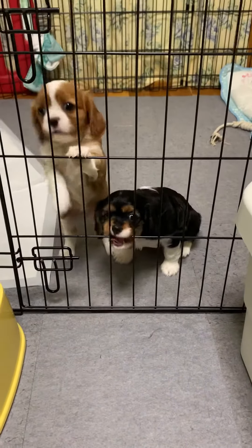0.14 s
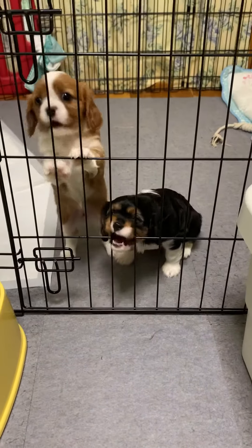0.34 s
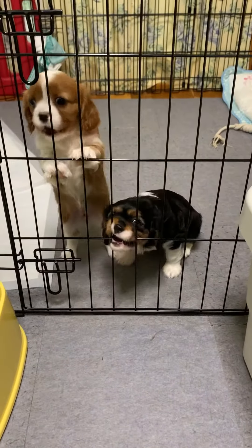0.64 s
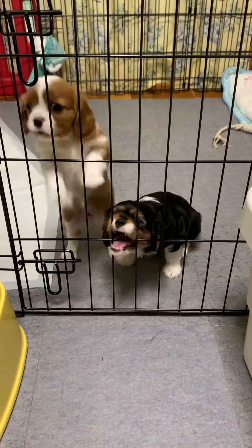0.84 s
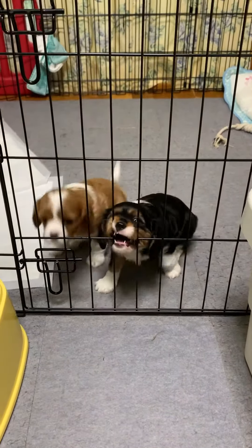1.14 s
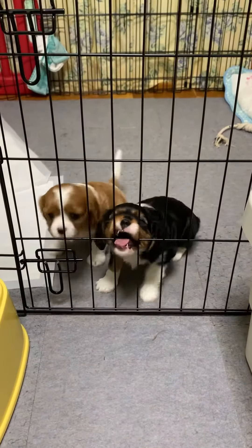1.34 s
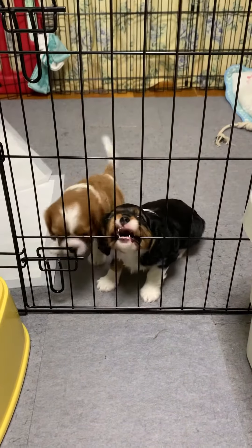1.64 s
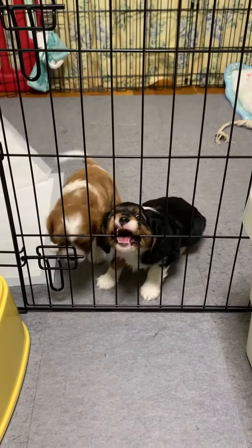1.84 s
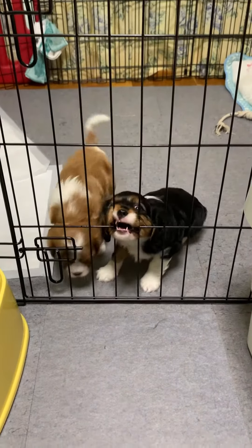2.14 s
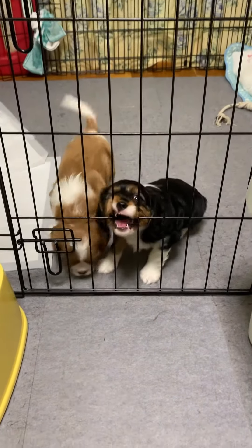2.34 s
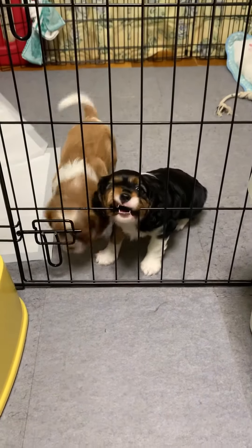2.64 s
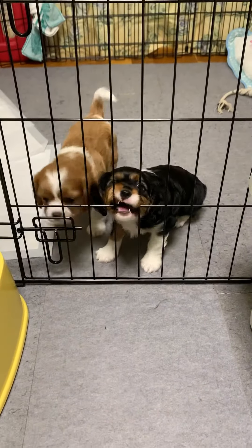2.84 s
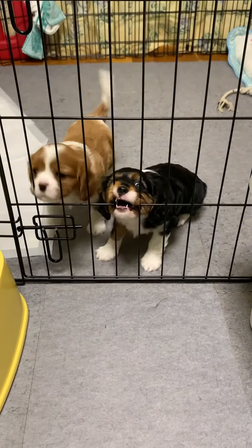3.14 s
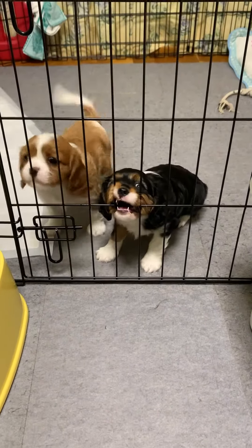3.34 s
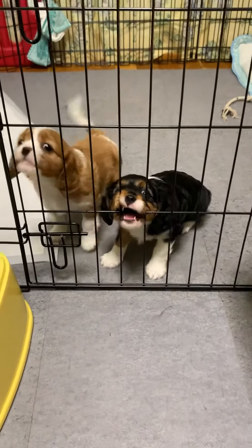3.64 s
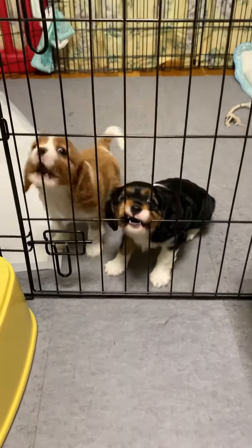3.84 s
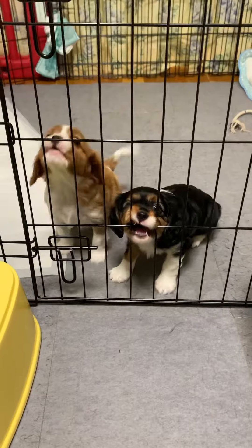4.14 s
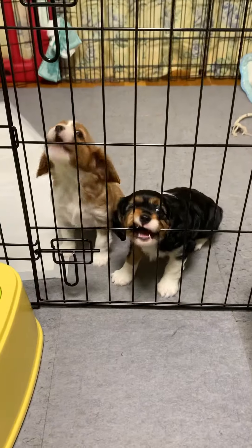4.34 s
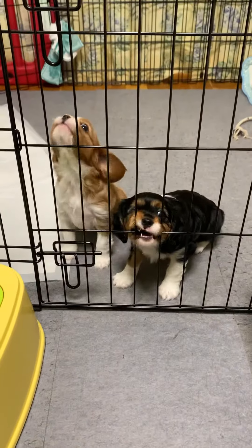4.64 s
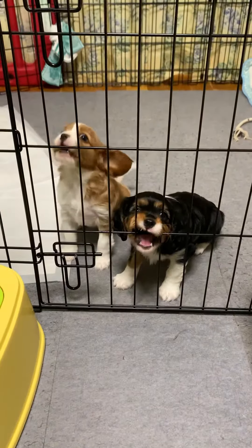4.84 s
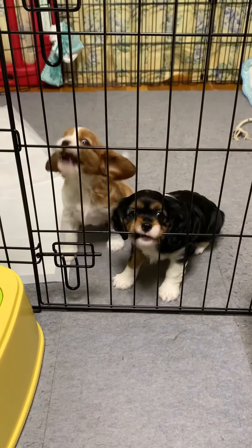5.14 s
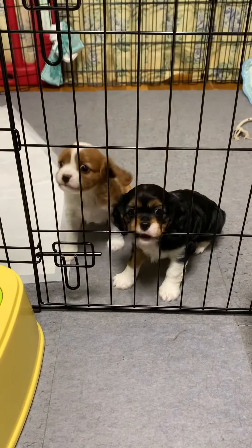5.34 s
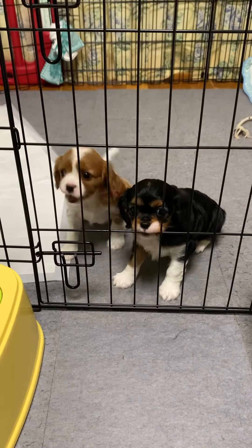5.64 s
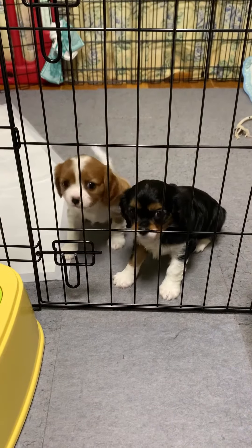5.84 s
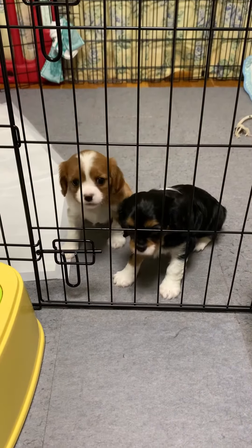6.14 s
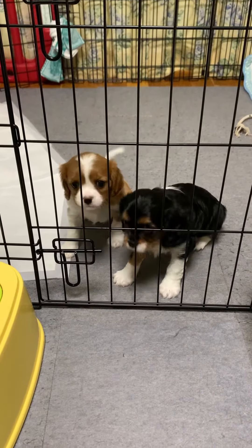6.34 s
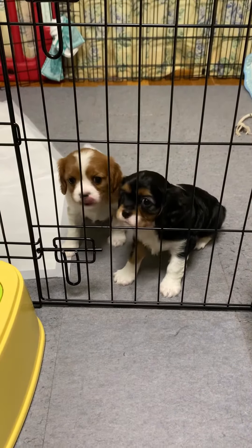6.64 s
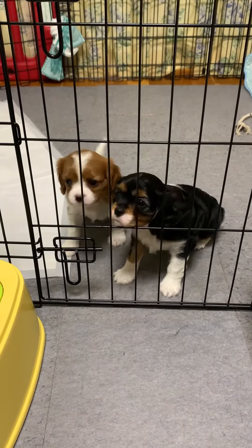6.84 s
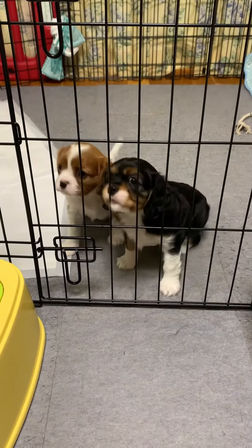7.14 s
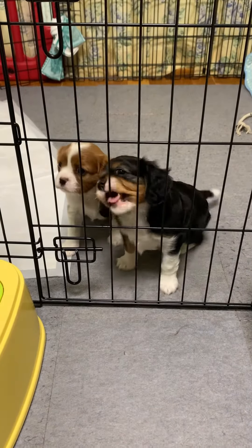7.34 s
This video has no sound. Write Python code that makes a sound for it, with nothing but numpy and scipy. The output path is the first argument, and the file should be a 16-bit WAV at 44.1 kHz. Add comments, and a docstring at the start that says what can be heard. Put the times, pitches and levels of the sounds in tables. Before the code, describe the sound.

In a small room, two puppies cry in a wire pen, picked up fairly close in stereo. A low machine hum throbs rapidly, about thirteen soft pulses a second, under faint still air, growing clearly louder to the end. A faint pant opens, then sharp, high, slightly raspy yelps hit at 0.15, 0.5 and 0.8 s, with softer whines between. A quieter fourth yelp at 1.4 s falls into a long whine. From about 2 to 5 s thin, arching whimpers overlap longer, flatter open-mouthed whines, increasingly breaking into rasps; soft paw scuffs fall at 2.1, 2.7 and 3.2 s. A distinct claw tick rings on the wire at 4.8 s. Low, rough groans appear from 4.8 to 6.5 s among shorter, sparser whimpers, with light ticks near 6 s. Two gentle whines come around 6.9 s, a breathy puff at 7.2 s, then a short high squeal at 7.4 s.

```python
"""Two puppies in a wire pen: three yelps with whines between them, a fourth yelp, overlapping whines that
break into rasps, low groans from about 4.8 s and a squeal near the end. Voices are fold harmonics shaped by
throat and mouth; pants are noise puffs. Claws tick on ringing pen modes and paws scuff softly from 1.3 s on.
Throughout, knocked panels throb in a low hum that grows louder, over still air. A small room adds reflections
and a microphone pair adds phase and level differences."""
import sys
import numpy as np
from scipy import signal
from scipy.fft import rfft, irfft
from scipy.io import wavfile
from scipy.ndimage import uniform_filter1d

SR = 44100
rng = np.random.default_rng(int(sys.argv[2]) if len(sys.argv) > 2 else 0)


def to_wav(sig):
    """Store sig (one row per channel, or 1-D mono) as 16-bit WAV at the path in sys.argv[1].

    Samples outside -1..1 are clipped; the rate is SR.
    """
    pcm = np.clip(np.atleast_2d(sig), -1, 1) * 32767
    pcm = np.round(pcm).astype(np.int16)
    wavfile.write(sys.argv[1], SR, pcm.T)  # frames by channels


N = 330750
TIME = np.arange(N) / SR
CUTOFF_HZ = 15800


def from_db(db):
    """Decibels to amplitude gain."""
    return 10 ** (np.asarray(db) / 20)


def rms_one(x):
    """Scale to unit power."""
    return x / np.sqrt(np.mean(x ** 2) + 1e-20)


def at_hz(points, hz):
    """Interpolate a spectrum on a log-frequency axis."""
    point_hz, value = np.transpose(points)
    return np.interp(np.log(np.maximum(hz, 1)), np.log(point_hz), value)


def low_pass(x, hz):
    """Second-order low-pass."""
    return signal.sosfilt(signal.butter(2, min(hz, .45 * SR), fs=SR, output="sos"), x)


def wander(size, hz):
    """Low-passed random motion, rms 1."""
    settled = low_pass(rng.standard_normal(size + SR // 4), hz)[-size:]
    return rms_one(settled)


def coloured_noise(spectrum):
    """Noise of a given colour, rms 1."""
    gain = from_db(at_hz(spectrum, np.fft.rfftfreq(N, 1 / SR)))
    return rms_one(irfft(rfft(rng.standard_normal(N)) * gain, N))


def arch(t, turn_s, first, turn, last, ease_in, ease_out):
    """Control curve from first value through a turning point to last; an ease of 1 is straight."""
    before = np.clip(1 - t / max(turn_s, 1e-3), 0, 1)
    after = np.clip((t - turn_s) / max(t[-1] - turn_s, 1e-3), 0, 1)
    return turn + (first - turn) * before ** ease_in + (last - turn) * after ** ease_out


def gesture(rows, fade_s=.008):
    """Sample indices, soft on-off gate and control curves of one utterance."""
    s, *columns = np.transpose(rows)
    at = np.flatnonzero((TIME > s[0] - fade_s / 2) & (TIME < s[-1] + fade_s))
    t = TIME[at]
    gate = np.clip(np.minimum(t - t[0], s[-1] + fade_s - t) / fade_s, 0, 1)
    return at, gate, [np.interp(t, s, c) for c in columns]


def ring(clicks, hz, t60_s):
    """Damped resonance: a unit click starts a decaying sine of height 1."""
    r = from_db(-60 / (t60_s * SR))
    w = 2 * np.pi * hz / SR
    return signal.lfilter([0, np.sin(w)], [1, -2 * r * np.cos(w), r * r], clicks + 1e-18)


def strikes(events):
    """One click per (time [s], level [dB]) row."""
    out = np.zeros(N)
    for s, db in events:
        out[int(s * SR)] += from_db(db)
    return out


def yelps():
    """Hard, fast cries and the last squeal: strong effort swells, and the folds rasp at each onset."""
    # yelps: (start [s], length [s], pitch turn after [s], first pitch [Hz], turning pitch [Hz],
    # last pitch [Hz], loudest after [s], fundamental [dB], octave [dB], overtones [dB])
    yelp_events = [ (0.15, 0.085, 0.066, 1048, 1639, 1598, 0.058, -31.5, -42.5, -43.5),
                   (0.472, 0.123, 0.047, 1000, 1557, 1648, 0.06, -37, -40, -47),
                   (0.787, 0.099, 0.067, 1043, 1567, 1556, 0.057, -37.5, -45.5, -45.5),
                   (1.43, 0.135, 0.047, 1438, 1680, 1211, 0.075, -51.5, -48.5, -48.5),
                   (7.363, 0.16, 0.0605, 1880, 1947, 1840, 0.003, -42.5, -39, -46.5), ]
    # mouth gain on the octave: (frequency [Hz], level [dB])
    mouth = [(2100, 0), (2600, 2), (3100, -10), (3300, -26), (3800, -10)]
    # rasps within the cries: (from [s], to [s], roughness [0-1])
    rasps = [(0.184,0.198,0.59),(0.529,0.6,0.71),(0.869,0.877,0.54),(7.374,7.397,0.22)]
    # throat gain on the overtones: (frequency [Hz], level [dB])
    throat = [(2600,17),(3300,-21),(3800,16.5),(4500,-4.5),(5100,9),(5600,-5.5),(6200,-2.5),(7000,-13.5),(9500,-13),(11000,-21.5),(12400,-13.5),(13300,-13.5),(14200,-22.5),(16000,-23.5)]
    shapes = cry_shapes(yelp_events, mouth, swell_db=31.5, fade_db=6, opening_db=21, closing_db=19.5,
                        widest_share=0.3, octave_follows=0.49, scoop_ease=1.3, sag_ease=1.3,
                        waver=0.0028, catch_db=6)
    return cries(shapes, onset_rasps(yelp_events) + rasps, throat, quiver=0.012, hoarse=0.031,
                 shimmer_db=3.5, rasp_width_hz=340, core_rough=0.17, split=1.1)


def thin_whines():
    """First puppy: short arching whines through a nearly closed mouth."""
    # whines: (start [s], length [s], pitch turn after [s], first pitch [Hz], turning pitch [Hz],
    # last pitch [Hz], loudest after [s], fundamental [dB], octave [dB], overtones [dB])
    whine_events = [ (1.112, 0.12, 0.058, 957, 1323, 1180, 0.058, -56.5, -60, -68),
                    (1.335, 0.11, 0.06, 914, 1326, 1440, 0.005, -67.5, -58.5, -70),
                    (2.185, 0.064, 0.04, 953, 1130, 1056, 0.027, -65.5, -64, -76.5),
                    (2.465, 0.041, 0.036, 870, 753, 796, 0.033, -60.5, -67, -75),
                    (2.505, 0.13, 0.028, 835, 917, 749.5, 0.15, -56, -64.5, -79),
                    (2.87, 0.09, 0.056, 808, 1150, 1060, 0.047, -60.5, -62, -72.5),
                    (2.955, 0.15, 0.11, 1056, 1061, 939, 0.084, -55.5, -73, -70.5),
                    (3.28, 0.31, 0.087, 718, 1155, 1097, 0.12, -58, -64.5, -68.5),
                    (3.66, 0.1, 0.042, 760.5, 1242, 1185, 0.05, -60, -63, -72),
                    (3.77, 0.18, 0.1, 1197, 1153, 1125, 0.15, -51.5, -57, -63),
                    (4.14, 0.15, 0.043, 784.3, 1177, 976, 0.14, -55, -58.5, -66.5),
                    (4.29, 0.14, 0.076, 981.5, 1180, 1045, 0.086, -49.5, -59.5, -68),
                    (4.69, 0.069, 0.027, 710, 814, 697, 0.047, -50, -71, -75.5),
                    (4.83, 0.18, 0.094, 717.6, 985, 953, 0.089, -53.5, -66.5, -85),
                    (5.095, 0.098, 0.028, 938, 975, 743, 0.066, -55, -62, -71.5),
                    (5.502, 0.078, 0.036, 777, 861, 660, 0.044, -56.5, -60.5, -78.5),
                    (5.72, 0.11, 0.056, 942, 921, 790, 0.072, -60, -63.5, -77),
                    (6.19, 0.1, 0.05, 813.4, 861, 802, 0.037, -79, -66.5, -82.5),
                    (6.3, 0.084, 0.035, 782, 786.3, 765, 0.037, -66, -63, -76.5),
                    (6.865, 0.1, 0.049, 880, 1032, 873, 0.015, -62.5, -71, -81.5),
                    (6.96, 0.13, 0.1, 893, 1032, 996, 0.085, -57.5, -65, -74), ]
    # mouth gain on the octave: (frequency [Hz], level [dB])
    mouth = [(1400, -3), (1700, 1), (2100, -6), (2350, -9), (2700, -24)]
    # rasps: (from [s], to [s], roughness [0-1])
    rasps = [(1.333,1.37,0.71),(4.71,4.883,0.54),(5.126,5.153,1),(5.543,5.62,0.6),(6.859,6.921,1)]
    # throat gain on the overtones: (frequency [Hz], level [dB])
    throat = [(2400,1.5),(3300,-8),(4300,-4.5),(5300,-5.5),(7000,-2.5),(8500,-1),(10000,-11),(12000,-40.5),(16000,-14.5)]
    shapes = cry_shapes(whine_events, mouth, swell_db=13.5, fade_db=9, opening_db=11.5, closing_db=14.5,
                        widest_share=1.0, octave_follows=0.24, scoop_ease=1.7, sag_ease=1.2,
                        waver=0.0071, catch_db=7)
    return cries(shapes, rasps, throat, quiver=0.011, hoarse=0.061, shimmer_db=3.5,
                 rasp_width_hz=67, core_rough=0.6, split=0.51)


def full_whines():
    """Second puppy: longer, open-mouthed, flatter notes with a strong octave."""
    # whines: (start [s], length [s], pitch turn after [s], first pitch [Hz], turning pitch [Hz],
    # last pitch [Hz], loudest after [s], fundamental [dB], octave [dB], overtones [dB])
    whine_events = [ (0.29, 0.27, 0.06, 1078, 1048, 976, 0.079, -64, -73, -90),
                    (0.62, 0.19, 0.1, 970, 942, 980, 0.06, -61, -64.5, -85.5),
                    (0.91, 0.047, 0.03, 1030, 1065, 1094, 0.0087, -65, -68, -117),
                    (1.52, 0.44, 0.08, 1327, 1116, 1053, 0.34, -56, -51, -74.5),
                    (2.255, 0.27, 0.048, 1049, 1018, 1023, 0.15, -55.5, -56, -79),
                    (2.49, 0.31, 0.037, 1015, 1063, 946, 0.037, -56.5, -70.5, -83),
                    (3.072, 0.17, 0.079, 1015, 1000, 1082, 0.18, -56, -59.5, -84.5),
                    (3.23, 0.26, 0.067, 1080, 984, 951, 0.11, -53, -56.5, -76.5),
                    (3.75, 0.37, 0.11, 953, 858, 929.8, 0.15, -56, -53.5, -76.5),
                    (4.412, 0.237, 0.195, 940, 808, 835, 0.13, -55.5, -59, -81),
                    (4.66, 0.13, 0.063, 834, 903, 883, 0.033, -58.5, -56.5, -83.5),
                    (5.24, 0.13, 0.097, 692, 921, 842, 0.031, -57.5, -72, -98.5), ]
    # mouth gain on the octave: (frequency [Hz], level [dB])
    mouth = [(1500, -6), (1800, -3), (2400, -0.5)]
    # rasps: (from [s], to [s], roughness [0-1])
    rasps = [(1.957,1.99,0.58),(2.235,2.301,1),(3.058,3.237,0.78),(3.747,3.817,0.25),(4.411,4.519,0.99),(4.569,4.666,0.8),(4.704,4.806,0.44),(5.238,5.378,0.96)]
    # throat gain on the overtones: (frequency [Hz], level [dB])
    throat = [(2500,21.5),(3100,-1),(3900,15),(5000,9.5),(6000,4),(7000,-5.5),(8700,6.5),(10000,-12.5),(11000,-2.5),(12400,-11.5),(14700,-9),(16000,-13)]
    shapes = cry_shapes(whine_events, mouth, swell_db=9, fade_db=3, opening_db=5, closing_db=4,
                        widest_share=0.41, octave_follows=0.99, scoop_ease=1.6, sag_ease=1.1,
                        waver=0.01, catch_db=1.5)
    return cries(shapes, rasps, throat, quiver=0.0068, hoarse=0.03, shimmer_db=1.5,
                 rasp_width_hz=300, core_rough=0.24, split=0.42)


def onset_rasps(events, length_s=0.0098, rough=0.36):
    """The folds rasp briefly as each cry starts: rows of (from [s], to [s], roughness [0-1])."""
    return [(start - length_s / 2, start + length_s, rough) for start, *_ in events]


def cry_shapes(events, mouth, swell_db, fade_db, opening_db, closing_db, widest_share, octave_follows,
               scoop_ease, sag_ease, waver, catch_db, catch_s=0.017):
    """One push per cry: it catches, pitch bends and wavers, effort swells and fades, the mouth opens and closes.

    Rows: (time [s], pitch [Hz], fundamental [dB], octave [dB], overtones [dB])."""
    shapes = []
    unsteady = waver * wander(N, hz=9)
    for (start, length, turn_s, first_hz, turn_hz, last_hz,
         loudest_s, level_db, octave_db, overtones_db) in events:
        t = np.arange(0, length, 1e-3)
        pitch = arch(t, turn_s, first_hz, turn_hz, last_hz, scoop_ease, sag_ease)
        pitch = pitch * (1 + np.interp(start + t, TIME, unsteady))
        catch = catch_db * np.exp(-t / catch_s)
        effort = catch + arch(t, loudest_s, -swell_db, 0, -fade_db, ease_in=1.2, ease_out=1.27)
        # mouth widest between the pitch turn (share 0) and mid-cry (share 1)
        widest_s = turn_s + widest_share * (length / 2 - turn_s)
        opening = catch + arch(t, widest_s, -opening_db, 0, -closing_db, ease_in=1.5, ease_out=2.7)
        octave = octave_db + octave_follows * opening + at_hz(mouth, 2 * pitch)
        shapes.append(np.transpose([start + t, pitch, level_db + effort, octave, overtones_db + opening]))
    return shapes


def fold_phase(pitch, quiver, jitter):
    """Vocal fold phase: pitch glides, quivers slowly and jitters fast."""
    glide = uniform_filter1d(pitch, size=500, mode="nearest")
    unsteady = quiver * wander(len(pitch), hz=45.9) + jitter * wander(len(pitch), hz=494)
    return 2 * np.pi * np.cumsum(glide * (1 + unsteady)) / SR


def cries(calls, rasps, throat, quiver, hoarse, shimmer_db, rasp_width_hz, core_rough, split):
    """Fold harmonics through the throat; in a rasp the lines smear and split."""
    out, rough = np.zeros(N), np.zeros(N)
    for start, end, amount in rasps:
        rough[int(start * SR):int(end * SR)] = min(amount, 1)
    rough = uniform_filter1d(rough, size=750)
    for rows in calls:
        at, gate, (pitch, first_db, octave_db, overtones_db) = gesture(rows)
        size = len(at)
        phase = fold_phase(pitch, quiver, 0.0042 + 0.034 * rough[at])
        # strained folds repeat every third cycle: lines between the harmonics
        undertone = split * np.cos(phase / 3 + wander(size, hz=34.6))
        for k in range(1, int(CUTOFF_HZ / pitch.min()) + 1):
            if k == 1:
                level_db = first_db
            elif k == 2:
                level_db = octave_db
            else:
                level_db = overtones_db + at_hz(throat, k * pitch)
            level = from_db(level_db + shimmer_db * wander(size, hz=34.7)) * (k * pitch < SR / 2)
            # breathiness rises with frequency; the fundamental stays cleanest
            smear = hoarse * (1 + k * pitch / 3500) + rough[at]
            if k == 1:
                smear = smear * core_rough
            along = 1.3 * undertone + .6 * wander(size, rasp_width_hz)
            across = 1.5 * undertone * wander(size, hz=25) + .7 * wander(size, rasp_width_hz)
            line = (1 + smear * along) * np.sin(k * phase) + smear * across * np.cos(k * phase)
            out[at] += np.sqrt(2) * gate * level * line
    return out


def groans():
    """Slack folds beat slowly; a little air escapes on every beat."""
    # throat colour of voice and breath: (frequency [Hz], level [dB])
    throat = [(250,-10),(520,10),(800,10.5),(1080,4),(1600,12.5),(2300,-5.5),(3500,-23),(6000,-13.5),(8500,-8),(11000,-14.5),(16000,-41)]
    out, breath = np.zeros(N), coloured_noise(throat)
    for rows in groan_shapes():
        at, gate, (pitch, level_db) = gesture(rows)
        phase = fold_phase(pitch, quiver=.012, jitter=.012)
        voice = 0
        for k in range(2, 50):
            harmonic_db = at_hz(throat, k * pitch) + 2 * wander(len(at), hz=20)
            voice = voice + from_db(harmonic_db) * np.cos(k * phase)
        escape = .25 * breath[at] * (1 + np.cos(phase))
        out[at] += gate * from_db(level_db) * (rms_one(voice) + escape)
    return out


def groan_shapes(swell_db=10, fade_db=11, glide_ease=2.2):
    """Groans swell and fade; pitch wobbles and slides late. Rows: (time [s], pitch [Hz], level [dB])."""
    # groans: (start [s], length [s], first pitch [Hz], last pitch [Hz],
    # loudest after [s], may lie past the end, level [dB])
    groan_events = [(4.831, 0.08, 214, 239, 0.04, -65), (5.172, 0.23, 321.4, 375, 0.11, -59.5),
                    (5.585, 0.15, 284.5, 354, 0.33, -56.5), (6.017, 0.435, 267.7, 251, 0.085, -60)]
    shapes = []
    wobble = .04 * wander(N, hz=9)
    for start, length, first_hz, last_hz, loudest_s, level_db in groan_events:
        t = np.arange(0, length, 1e-3)
        pitch = first_hz + (last_hz - first_hz) * (t / length) ** glide_ease
        pitch = pitch * (1 + np.interp(start + t, TIME, wobble))
        effort = arch(t, loudest_s, -swell_db, 0, -fade_db, ease_in=1.2, ease_out=1.4)
        shapes.append(np.transpose([start + t, pitch, level_db + effort]))
    return shapes


def pants():
    """Unvoiced puffs: coloured noise through a small muzzle."""
    # muzzle colour: (frequency [Hz], level [dB])
    colour = [(500,9.5),(1000,-9),(1800,2.5),(3300,-11),(5000,-7),(6500,-15),(8000,-12),(11000,-25.5),(16000,-54)]
    out, breath = np.zeros(N), coloured_noise(colour)
    for rows in pant_shapes():
        at, gate, (level_db,) = gesture(rows)
        out[at] += gate * from_db(level_db) * breath[at]
    return out


def pant_shapes(swell_db=14, fade_db=18):
    """A pant swells and dies away. Rows: (time [s], level [dB])."""
    # pants: (start [s], length [s], loudest after [s], level [dB])
    pant_events = [(0.0, 0.17, 0.023, -67), (2.03, 0.12, 0.024, -68.5), (3.555, 0.068, 0.034, -72),
                   (6.604, 0.19, 0.057, -71.5), (7.181, 0.18, 0.11, -64.5)]
    shapes = []
    for start, length, loudest_s, level_db in pant_events:
        t = np.arange(0, length, 1e-3)
        effort = arch(t, loudest_s, -swell_db, 0, -fade_db, ease_in=1.0, ease_out=3.0)
        shapes.append(np.transpose([start + t, level_db + effort]))
    return shapes


def claws():
    """Claw clicks excite the damped modes of the pen."""
    # claw ticks: (time [s], level [dB])
    ticks = [(1.292, -72), (4.3847, -63), (4.7685, -50.5), (5.0154, -64), (5.9212, -57), (6.0154, -58),
             (6.6275, -63.5), (7.206, -58.5)]
    # pen modes: (frequency [Hz], level [dB], t60 [s])
    pen_modes = [(1380,-2.5,0.024),(1740,-4,0.036),(3660,-10,0.016),(5160,-11.5,0.049),(6400,-10,0.014),(10700,-17,.012),(14000,-14.5,.01)]
    clicks = strikes(ticks)
    return sum(from_db(db) * ring(clicks, hz, t60_s) for hz, db, t60_s in pen_modes)


def paw_falls(decay_s=0.03, scuff_hz=800):
    """Pads land on the mat: dull noise under a decaying exponential."""
    # soft paw falls: (time [s], level [dB])
    paws = [(2.06, -65), (2.725, -62.5), (3.176, -62)]
    press = signal.lfilter([1], [1, -np.exp(-1 / (decay_s * SR))], strikes(paws) + 1e-18)
    return press * wander(N, scuff_hz)


def machine(turns_per_s=13.007, first_knock_s=0.00908, swell_hz=80):
    """One soft knock a turn keeps the panels ringing; their beating makes the hum throb."""
    # hum before the high-pass: (time [s], level [dB])
    hum_level = [(0.0, -52), (0.23, -51.5), (7.5, -43.5)]
    # panel modes: (frequency [Hz], level [dB], t60 [s])
    panel_modes = [(63.9,-27.5,.5),(91.2,-11.5,0.53),(105.24,-18.5,0.46),(131.9,-21.5,0.28),(169.37,-9.5,1),(180.2,-36.5,1),(194.1,1,0.62),(201.8,-9,0.25),(233.2,-9.5,0.95),(260.6,-18,0.98),(296,-24,1),(325,-25.5,1),(352.6,-22,0.31),(375.4,-30,0.56),(403.9,-23.5,0.29),(429.3,-30,0.21)]
    turns = np.arange(-turns_per_s // 1, N / SR * turns_per_s)
    # 1 s of run-in ahead of the scene
    at = ((first_knock_s + turns / turns_per_s + 1) * SR).astype(int)
    knocks = np.zeros(N + 2 * SR)
    knocks[at] = from_db(.25 * rng.standard_normal(len(at)))
    panels = 0
    for hz, db, t60_s in panel_modes:
        # band filter softens each panel's attack
        band_hz = [max(hz - swell_hz, hz / 2), hz + swell_hz]
        swell = signal.butter(1, band_hz, "band", fs=SR, output="sos")
        panels = panels + from_db(db) * rms_one(signal.sosfilt(swell, ring(knocks, hz, t60_s)))
    return rms_one(panels[SR:SR + N]) * from_db(np.interp(TIME, *np.transpose(hum_level)))


def hum_pair(delay_s=.00014, left_db=1.03):
    """The hum comes from one side: it reaches the left port later, and slightly stronger."""
    hum = signal.sosfilt(signal.butter(2, 70, "high", fs=SR, output="sos"), machine())
    left = from_db(left_db) * np.interp(TIME - delay_s, TIME, hum)
    return np.array([left, hum])


def still_air():
    """Steady coloured noise of the room air."""
    # air colour: (frequency [Hz], relative level per Hz [dB])
    air_colour = [(25,-6),(45,-8.5),(70,-3),(120,-3),(250,0),(400,-8),(600,-18),(1000,-20.5),(1800,-25.5),(3000,-29),(4500,-34),(6300,-38.5),(9000,-42.5),(12000,-39.5),(16000,-46)]
    return from_db(-64) * coloured_noise(air_colour)


def room(x, t60_s=.31, wall_hz=13000, gap_s=0.0085):
    """Dense decaying reflections, a little duller than the direct sound."""
    t = TIME[:SR // 2]
    decay = np.exp(-np.log(1000) * t / t60_s)
    echoes = low_pass(rng.standard_normal(len(t)), wall_hz) * (t > gap_s) * decay
    return signal.fftconvolve(x, echoes / np.sqrt(np.sum(echoes ** 2)))[:N]


def microphone_pair(x):
    """Both ports hear one sound with frequency-dependent phase and level differences."""
    # phase between ports: (frequency [Hz], left lead [rad])
    pair_phase = [(0, 0), (1290, -0.4), (2500, 1.5), (3960, 2.0), (6370, 5.9), (7490, 6.8), (8350, 9.0),
                  (9560, 9.8), (10400, 12.6), (11600, 12.7), (12600, 15.5), (13700, 15.9), (14600, 18.6),
                  (15900, 19.0)]
    # level between ports: (frequency [Hz], left minus right [dB])
    pair_balance = [(100,0),(500,-.4),(1000,0),(1600,-4),(2400,0),(16000,0)]
    hz = np.fft.rfftfreq(N, 1 / SR)
    half_lead = np.exp(.5j * np.interp(hz, *np.transpose(pair_phase)))
    left = half_lead * from_db(at_hz(pair_balance, hz) / 2)
    return irfft(rfft(x) * np.array([left, 1 / left]), N)


def scene():
    """Puppies and their feet in the room, over the machine and still air."""
    pen = yelps() + thin_whines() + full_whines() + groans() + pants() + claws() + paw_falls()
    near = pen + from_db(-13.0) * room(pen) + still_air()
    # dull far-wall reflections, independent at each port
    diffuse = from_db(-17) * low_pass(np.array([room(pen), room(pen)]), 2200)
    return microphone_pair(near) + diffuse + hum_pair()


def record(dry):
    """Steep elliptic low-pass at the cutoff."""
    return signal.sosfilt(signal.ellip(12, .1, 80, CUTOFF_HZ, fs=SR, output="sos"), dry)


dry = scene()
out = record(dry)
to_wav(out)
```